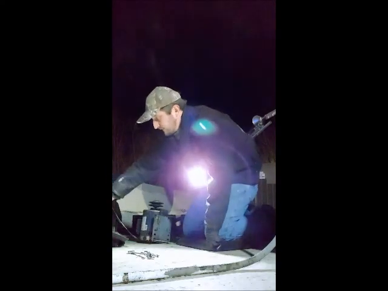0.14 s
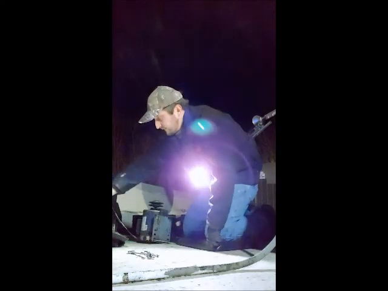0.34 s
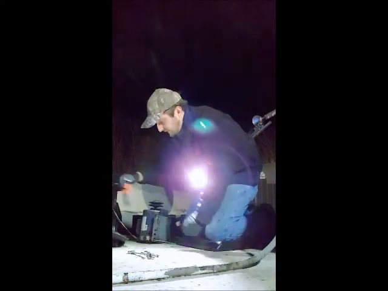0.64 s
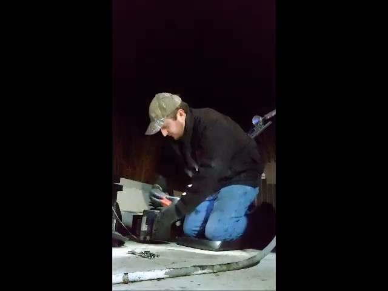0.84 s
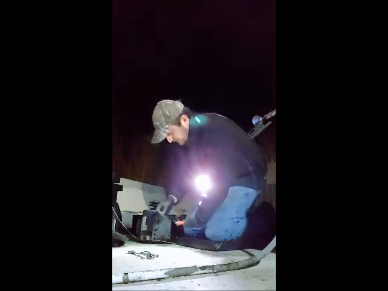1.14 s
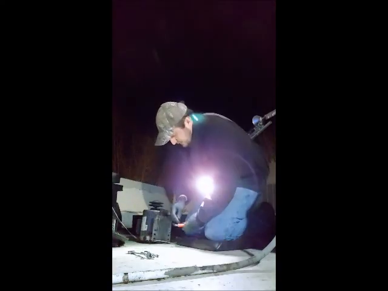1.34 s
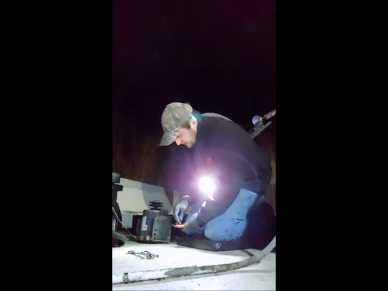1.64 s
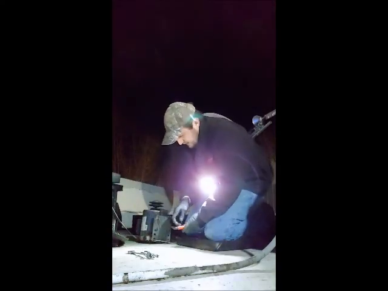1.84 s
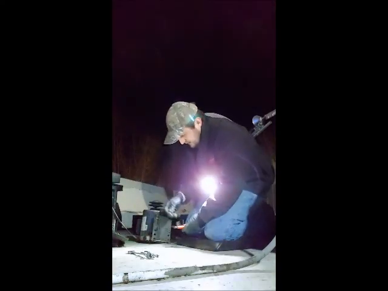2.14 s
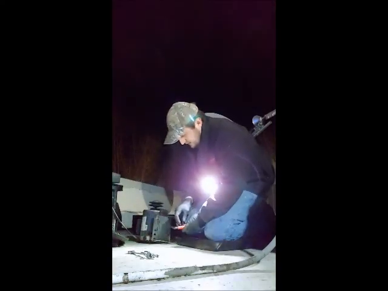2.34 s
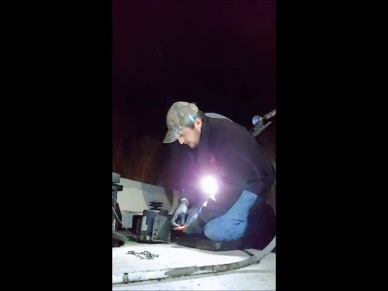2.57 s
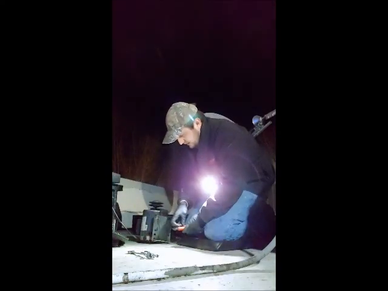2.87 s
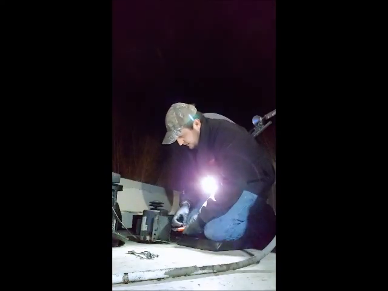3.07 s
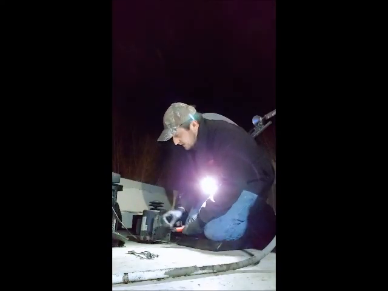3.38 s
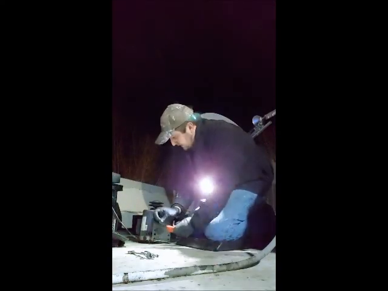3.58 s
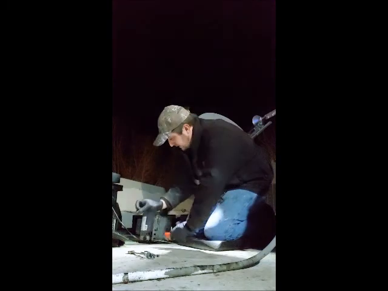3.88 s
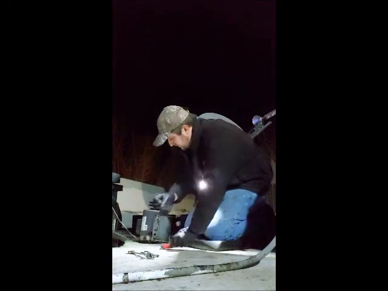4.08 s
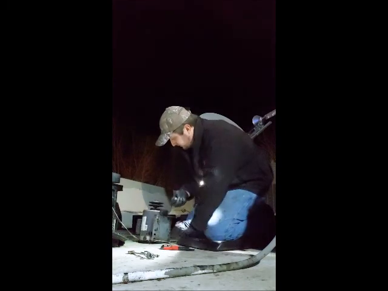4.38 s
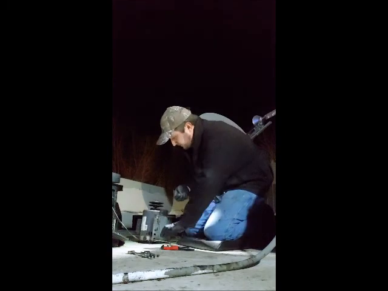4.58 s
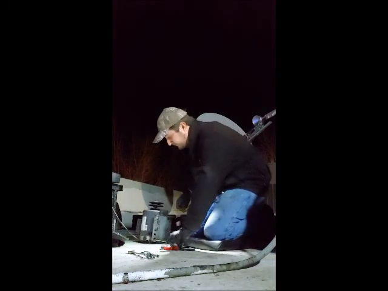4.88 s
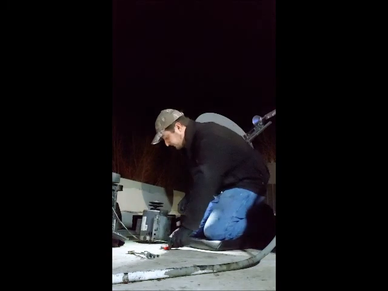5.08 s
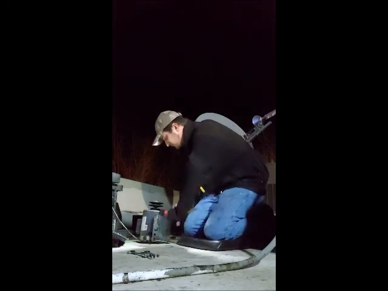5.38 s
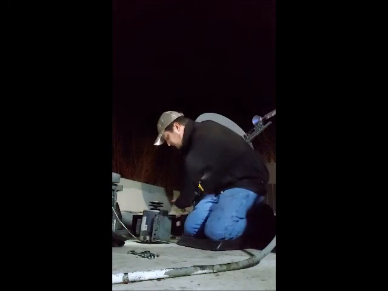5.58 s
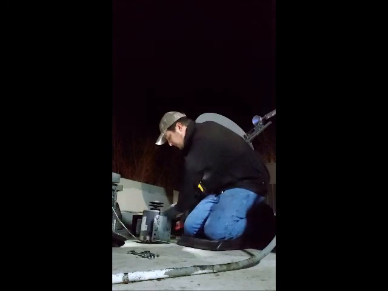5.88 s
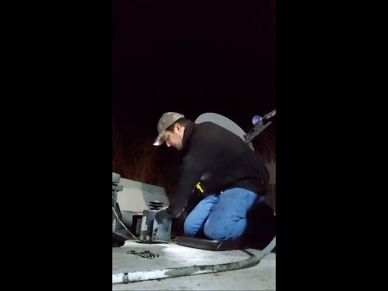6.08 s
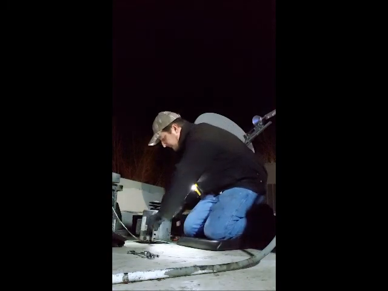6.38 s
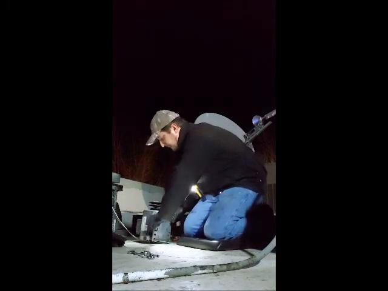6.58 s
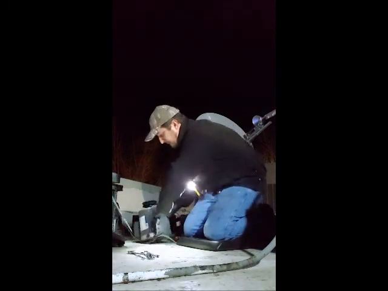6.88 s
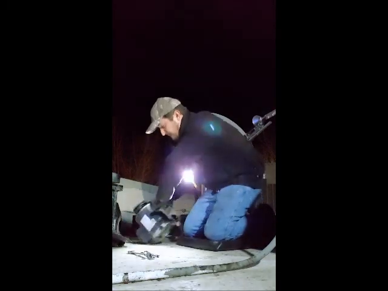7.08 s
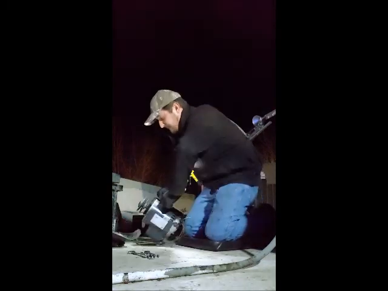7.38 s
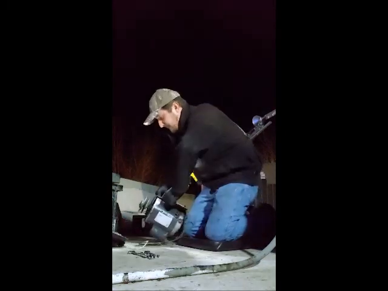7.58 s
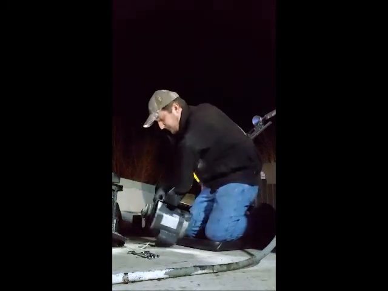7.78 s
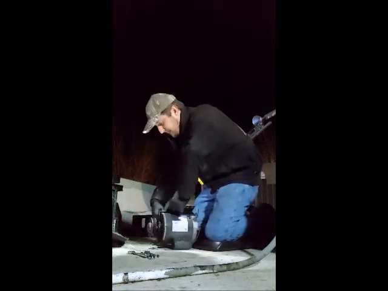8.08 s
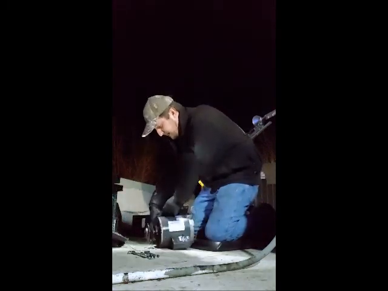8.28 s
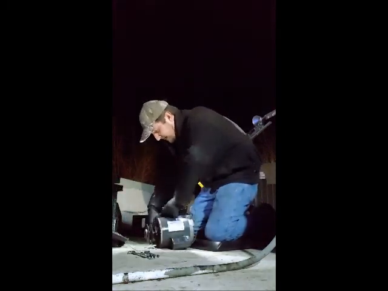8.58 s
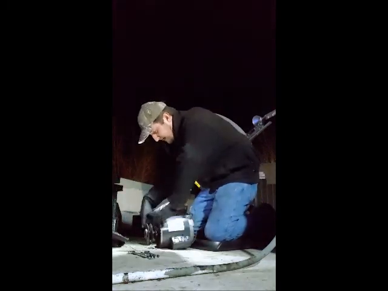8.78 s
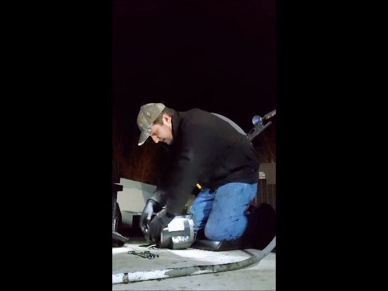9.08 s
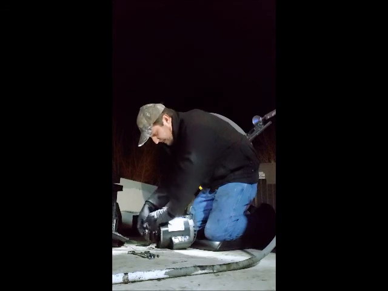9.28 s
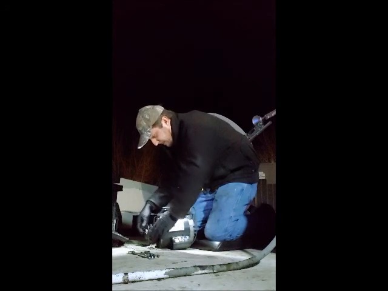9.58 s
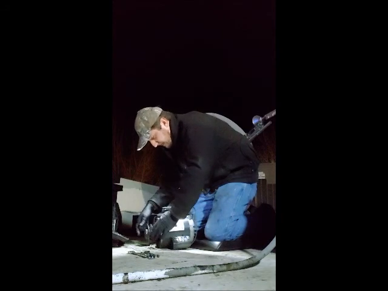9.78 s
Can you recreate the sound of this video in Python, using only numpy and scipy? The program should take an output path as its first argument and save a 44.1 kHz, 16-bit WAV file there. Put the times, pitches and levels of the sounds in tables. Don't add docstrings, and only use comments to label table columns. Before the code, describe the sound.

Constant rooftop ventilation hum and airy rumble, broken midway by a tick and sharp knock, another knock, and later a faint squeaky tap.

```python
import sys
import numpy as np
from scipy import signal
from scipy.fft import rfft, irfft, next_fast_len
from scipy.io import wavfile
from scipy.ndimage import uniform_filter1d

SR = 44100
rng = np.random.default_rng(int(sys.argv[2]) if len(sys.argv) > 2 else 0)


def field_ratio(decibels):
    return 10 ** (np.asarray(decibels, dtype=float) / 20)


def generate_wav(signal):
    frames = np.transpose(np.atleast_2d(signal))
    scaled = np.clip(frames, -1, 1) * 32767
    pcm = np.round(scaled).astype(np.int16)
    wavfile.write(sys.argv[1], SR, pcm)


N = 437913

# start in seconds, crack level in dB, thud level in dB,
# thud pitch in Hz, left minus right in dB.
KNOCKS = [
    (4.179, -27, -40, 900, 2),
    (4.2641, -17, -1.5, 624, -5.5),
    (6.2038, -13, -7, 764, -4.5),
    (8.1240, -23.5, -18, 400, 0),
]


def table(rows, hz):
    at_hz, *columns = np.transpose(rows)
    return np.array([np.interp(np.log(hz + 1), np.log(at_hz), c) for c in columns])


def walk(rate_hz):
    hold = int(SR / rate_hz)
    steps = np.repeat(rng.standard_normal(N // hold + 1), hold)
    return 1.28 * uniform_filter1d(uniform_filter1d(steps, hold), hold)[:N]


def ring(x, hz, t60_s):
    pole = np.exp(2j * np.pi * hz / SR - np.log(1000) / (t60_s * SR))
    return signal.lfilter([1], [1, -pole], x).imag


def pan(x, left_minus_right_db):
    return x * field_ratio(np.array([[left_minus_right_db], [-left_minus_right_db]]) / 2)


def knocks():
    out = np.zeros((2, N))
    t = np.arange(SR // 10) / SR
    bounce = 0
    for late_s, gain in [(0, 1), (0.0026, 0.35), (0.0058, 0.2)]:
        bounce = bounce + gain * (t >= late_s) * np.exp(-(t - late_s) / 0.0007)
    push = np.exp(-0.5 * ((t - 0.0003) / 0.00018) ** 2)
    for start_s, crack_db, thud_db, thud_hz, pan_db in KNOCKS:
        crack = rng.standard_normal((2, len(t))) * (bounce + 0.21 * np.exp(-t / 0.012))
        crack = crack + 1.2 * crack[::-1]
        crack = crack + 0.7 * np.diff(crack, n=2, prepend=0, append=0)
        crack = (crack + 0.13 * ring(crack, 2300, 0.0045) + 0.1 * ring(crack, 1100, 0.01)
                 + 0.09 * ring(crack, 5400, 0.0017))
        deck = np.minimum(t / 0.0016, 1) * ring(push, thud_hz, 0.013)
        overtone = 0.35 * ring(push, 2.3 * thud_hz, 0.009)
        shudder = 0.075 * ring(push, 167, 0.25)
        thud = -deck - overtone + shudder
        hit = field_ratio(crack_db) * crack + field_ratio(thud_db) * thud / abs(thud).max()
        at = int(start_s * SR)
        out[:, at:at + len(t)] += pan(hit, pan_db)
    return out


def squeaks():
    # start in seconds, length in seconds, start pitch in Hz, level in dB,
    # left minus right in dB.
    rubs = [
        (8.052, .016, 9300, -32, -3),
        (8.1215, 0.016, 5460, -24, 1),
        (8.135, 0.016, 5420, -30, -13),
    ]
    sag = 0.022
    out = np.zeros((2, N))
    for start_s, length_s, start_hz, level_db, pan_db in rubs:
        u = np.arange(int(length_s * SR)) / (length_s * SR)
        grip = np.minimum(1, np.minimum(u / 0.38, (1 - u) / 0.15))
        grip = grip * (1 + 0.35 * np.cos(2 * np.pi * (u - 0.38) / 0.45))
        tone = np.sin(2 * np.pi * np.cumsum(start_hz * (1 - sag * u)) / SR)
        at = int(start_s * SR)
        out[:, at:at + len(u)] += pan(field_ratio(level_db) * grip * tone, pan_db)
    return out


def compressor(wander=0.000121, wobble_db=1.1, scatter_rad=0.3, pipe_scatter_rad=1.57, lag_turns=-0.004):
    # multiple, left level in dB, right level in dB,
    # phase right leads in rad.
    strong_lines = [(15, -45, -50, -1.0), (16, -49, -48, -0.4), (18, -44, -50, -0.2), (19, -43, -50, -1.4),
                    (20, -31, -43, 1.3), (21, -36, -39, 0.9), (23, -48, -61, -0.2), (26, -80, -47, 2.8),
                    (31, -66, -47, -0.6), (32, -54, -38, -1.7), (33, -67, -48, 0.2), (37, -80, -49, 0.4),
                    (41, -68, -50, -3.1), (43, -39, -46, -2.6), (44, -51, -41, -1.0), (45, -55, -47, -0.5),
                    (46, -51, -43, -2.5), (47, -45, -55, -1.7), (49, -66, -50, 0.9), (50, -46, -42, 0.1),
                    (51, -42, -54, -0.8), (52, -45, -43, -1.5), (53, -57, -48, 0.2), (54, -47, -42, 0.7),
                    (68, -54, -52, 1.7), (69, -52, -56, 0.0), (72, -53, -57, 1.4), (113, -69, -55, 1.6),
                    (116, -70, -56, -3.0), (119, -63, -57, 1.8)]
    # frequency in Hz, level in dB.
    other_lines = [(800, -62), (2000, -64.5), (3500, -67), (5500, -61), (7000, -67.5), (9500, -72),
                   (15000, -72.5)]
    shaft_hz = 58.394
    multiple = np.arange(14, 258)
    echo = np.sqrt(rng.exponential(size=(2, len(multiple))))
    gain = field_ratio(table(other_lines, multiple * shaft_hz)) * echo
    strong = np.array(strong_lines, int)[:, 0] - multiple[0]
    _, left_db, right_db, lead_rad = np.transpose(strong_lines)
    gain[:, strong] = field_ratio(np.array([left_db, right_db]))
    phase = 2 * np.pi * rng.random(gain.shape)
    pipe = abs(multiple[strong] * shaft_hz - 2570) < 200
    spread = np.where(pipe, pipe_scatter_rad, scatter_rad) * rng.standard_normal(len(strong))
    blow = -np.pi * lag_turns * strong ** 2 + spread
    both = gain[0, strong] + gain[1, strong] * np.exp(1j * lead_rad)
    phase[0, strong] = blow - np.angle(both)
    phase[1, strong] = phase[0, strong] + lead_rad
    size = 2 ** 14
    lines = np.zeros((2, size // 2 + 1), complex)
    lines[:, multiple] = gain * np.exp(1j * phase)
    turn = irfft(lines) * size / np.sqrt(2)
    place = np.cumsum(shaft_hz * (1 + wander * walk(1.0))) / SR % 1 * size
    clatter = np.array([np.interp(place, np.arange(size), c, period=size) for c in turn])
    return clatter * field_ratio(wobble_db * walk(6))


def hum(trim_db=-0.5, wobble_db=1.56, wander=0.00036):
    # frequency in Hz, left level in dB, right level in dB,
    # phase right leads in rad.
    hum_tones = [(26.9, -52, -40, -1.2), (54.5, -35, -30, -1.1), (58.5, -43, -39, -0.9),
                 (109.0, -36, -35, -0.8), (117.1, -39, -37, -0.8), (119.8, -49, -37, 0.6),
                 (147.4, -33, -33, -0.5), (149.1, -37, -37, -0.5), (164.1, -32, -33, -0.6),
                 (299.4, -24, -24, -0.2), (310.9, -38, -44, -0.2), (372.1, -37, -39, -0.4),
                 (600.2, -42, -39, -0.1), (1912.4, -46, -41, 1.1)]
    out = 0
    for hz, left_db, right_db, lead_rad in hum_tones:
        sway = min(1, 300 / hz)
        turns = np.cumsum(hz * (1 + wander * sway * walk(2.52))) / SR + rng.random()
        phase = 2 * np.pi * turns
        tone = np.array([field_ratio(left_db) * np.sin(phase), field_ratio(right_db) * np.sin(phase + lead_rad)])
        out = out + tone * field_ratio(trim_db + wobble_db * min(1, hz / 150) * walk(8))
    return np.sqrt(2) * out


def air(swell_db=0.3, flicker_db=0.5):
    # frequency in Hz, left
    # level in dB per Hz, right level in dB per Hz.
    air_spectrum = [(20, -70.3, -61), (35, -61, -59.5), (47, -54, -52), (69, -52.5, -48), (97, -42, -40.5),
                    (120.6, -46.5, -48), (193, -46.5, -46.5), (248.5, -46, -47.5), (277.8, -39, -38),
                    (327, -48, -48.5), (498, -47, -46), (697, -53, -53.5), (755, -54, -53),
                    (856, -58.5, -57),
                    (960, -57.5, -55), (1260, -60, -58), (1430, -60, -60.5), (1600, -64, -58.0),
                   (1900, -68.5, -58), (2190, -64.5, -61.0), (2670, -69.5, -64.5), (3200, -68, -65.5),
                   (3500, -69, -67.5), (4270, -70.5, -70.5), (4830, -73, -73), (5460, -74, -73.5),
                   (6000, -76, -73), (6820, -82, -69)]
    # frequency in Hz, likeness from 0 to 1,
    # phase right leads in rad.
    port_likeness = [(30, .75, -1), (70, 0.91, -1), (130, 0.95, -0.9), (250, 0.96, 0.15), (500, 0.93, 0),
                     (800, 0.77, 0), (1020, 0.27, 0.2), (1400, 0, 2.5), (2000, 0.48, 4), (2280, 0.38, 4),
                     (3500, 0.24, 7), (5040, 0.12, 9.5)]
    # frequency in Hz, width in Hz, level in dB.
    duct_modes = [
        (106, 13, 1),
        (124, 12, -3.5),
        (172, 16, 2.5),
        (293.7, 16, 4),
        (543, 33, -2),
        (736, 15, 6.5),
    ]
    size = next_fast_len(N)
    hz = np.arange(size // 2 + 1) * SR / size
    like, phase = table(port_likeness, hz)
    like = np.clip(like, 0, 1) * (hz < 6000)
    left, other = rfft(rng.standard_normal((2, size)))
    right = like * np.exp(1j * phase) * left + np.sqrt(1 - like ** 2) * other
    noise = np.array([left, right]) * field_ratio(table(air_spectrum, hz)) * np.sqrt(SR / 2)
    noise *= field_ratio(sum(db / (1 + (2 * (hz - at_hz) / width_hz) ** 2) for at_hz, width_hz, db in duct_modes))
    octave = np.clip(np.log2((hz + 1) / 125), 0, 6)
    out, swell = 0, walk(0.33)
    for k in range(7):
        share = np.cos(np.pi / 2 * np.clip(octave - k, -1, 1)) ** 2
        band = irfft(noise * share, size)[:, :N]
        out = out + band * field_ratio(swell_db * swell + flicker_db * walk(9))
    return out


def scene():
    return knocks() + squeaks() + compressor() + hum() + air()


def roll_off(x):
    return signal.sosfilt(signal.butter(12, 15200, fs=SR, output="sos"), x)


def record(dry):
    # frequency in Hz, left gain in dB, right gain in dB.
    top_gain = [(6890, 0.5, 0.5), (7500, -2, -12.6), (7860, -12, -31), (8200, -58, -66), (8850, -31.9, -67),
                (9100, -18.5, -28.5), (10000, -9, -29.5), (10300, -20.5, -29.5), (11360, -11, -23.5),
                (12300, -19, -29.5), (13000, -33, -25), (13600, -57, -25), (14200, -34, -26),
                (15100, -37, -28.5)]
    duck_from_db, duck_per_db, release_s = -24.5, 0.3149, 0.35
    t = np.arange(N) / SR
    duck_db = np.zeros(N)
    for start_s, crack_db, *_ in KNOCKS:
        depth_db = duck_per_db * max(crack_db - duck_from_db, 0)
        recovery = np.exp(-np.maximum(t - start_s, 0) / release_s)
        duck_db -= depth_db * (t > start_s + 0.004) * recovery
    ducked = dry * field_ratio(uniform_filter1d(duck_db, size=64))
    size = next_fast_len(N)
    hz = np.arange(size // 2 + 1) * SR / size
    coloured = irfft(rfft(ducked, size) * field_ratio(table(top_gain, hz)), size)[:, :N]
    return roll_off(np.clip(coloured, -1, 1))


dry = scene()
out = record(dry)
generate_wav(out)
```